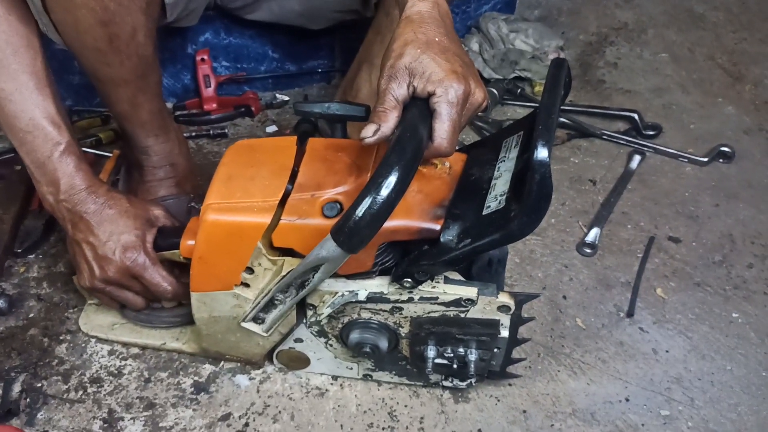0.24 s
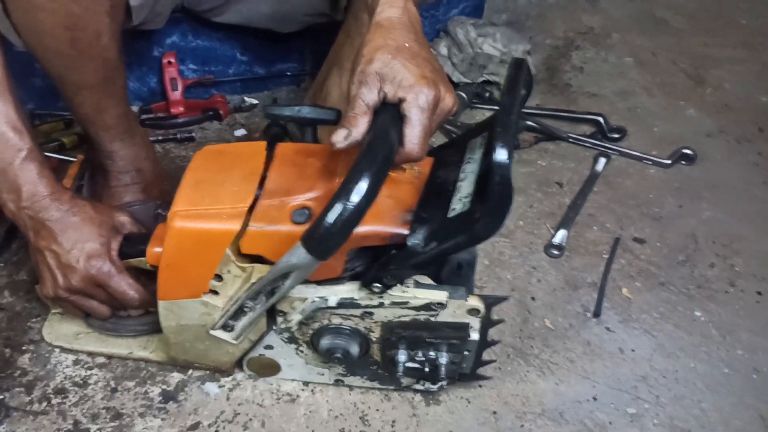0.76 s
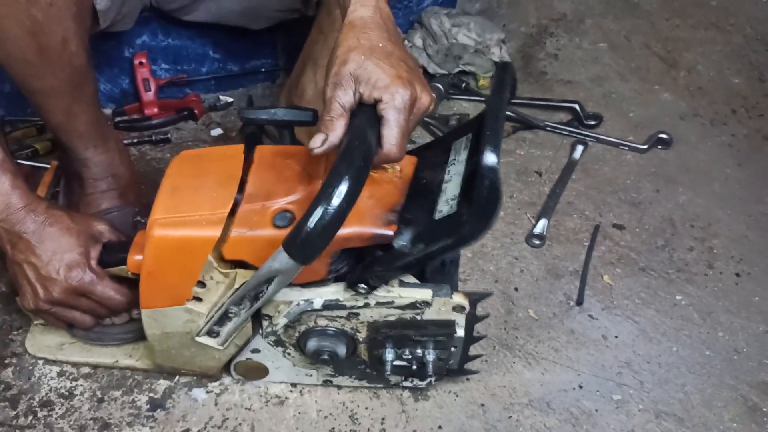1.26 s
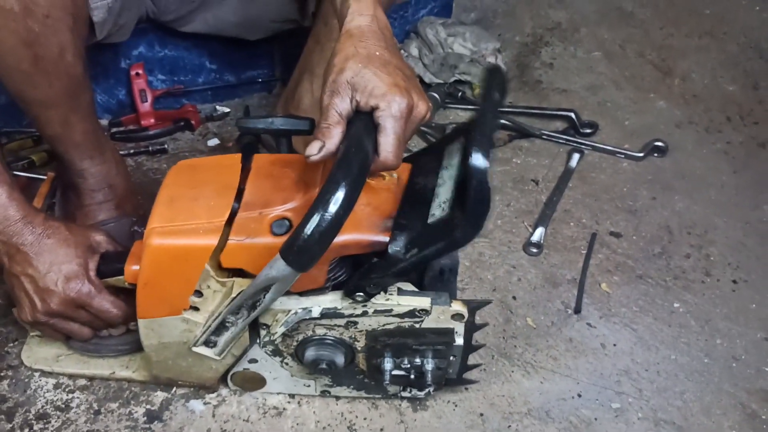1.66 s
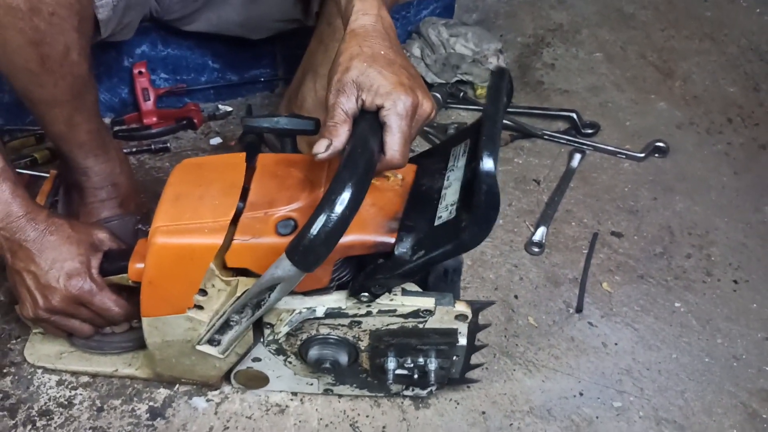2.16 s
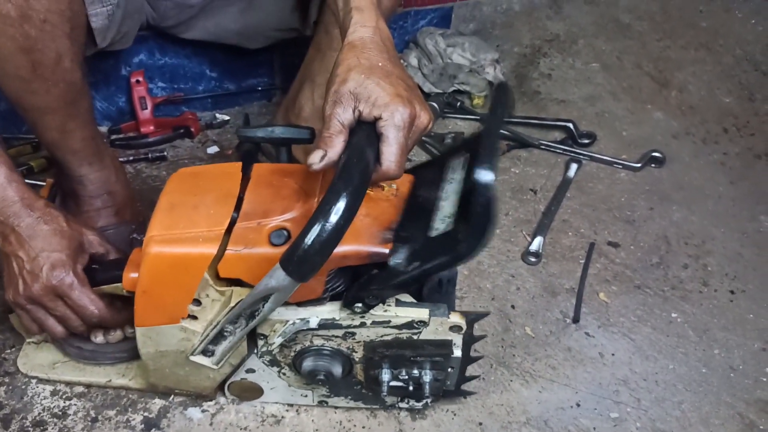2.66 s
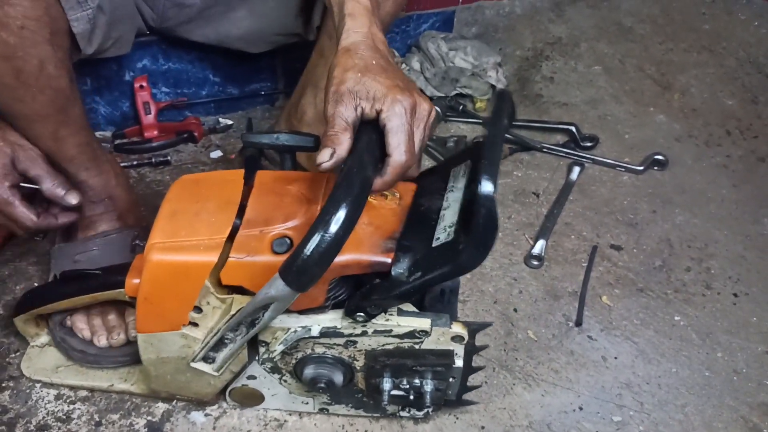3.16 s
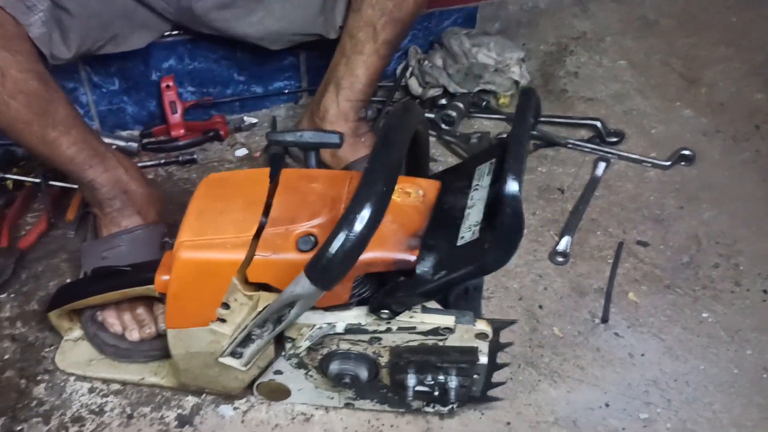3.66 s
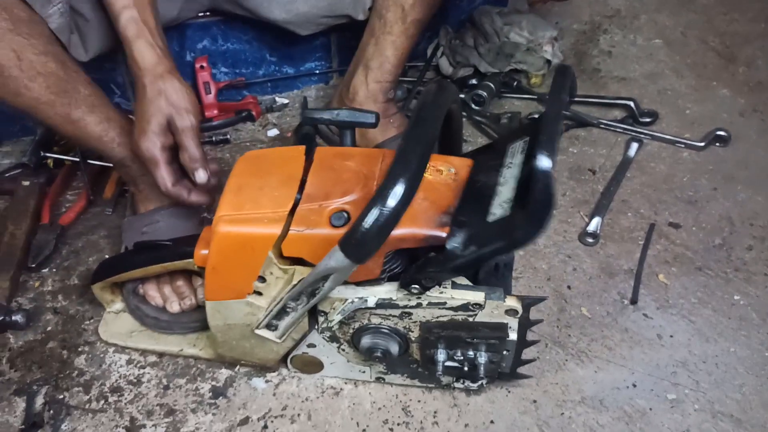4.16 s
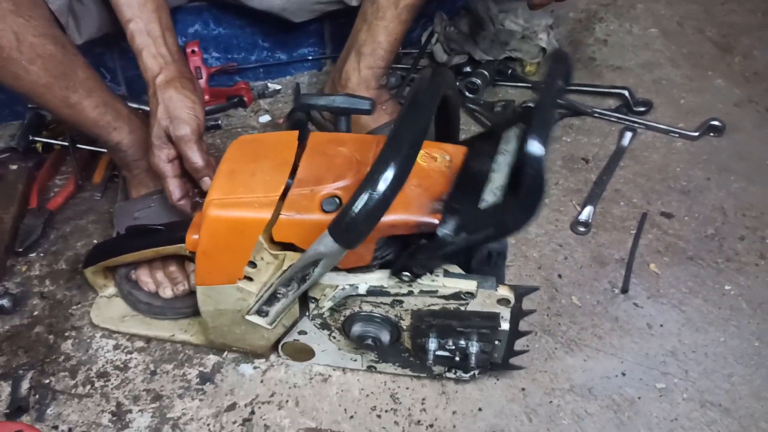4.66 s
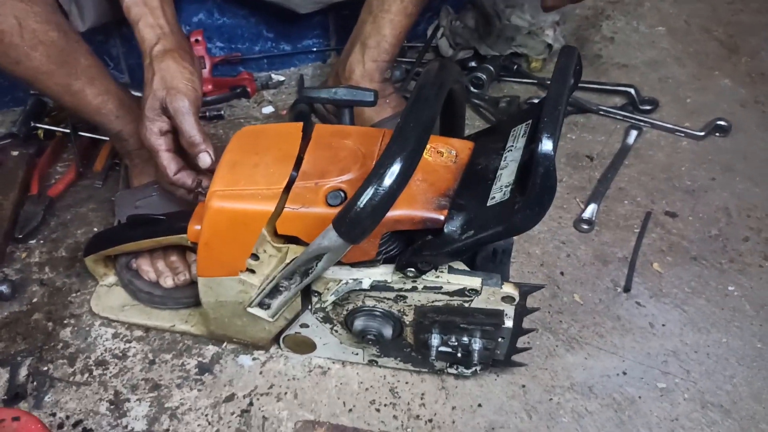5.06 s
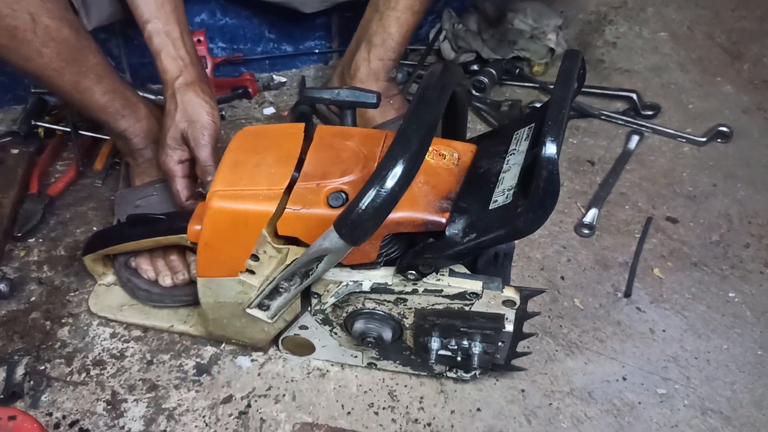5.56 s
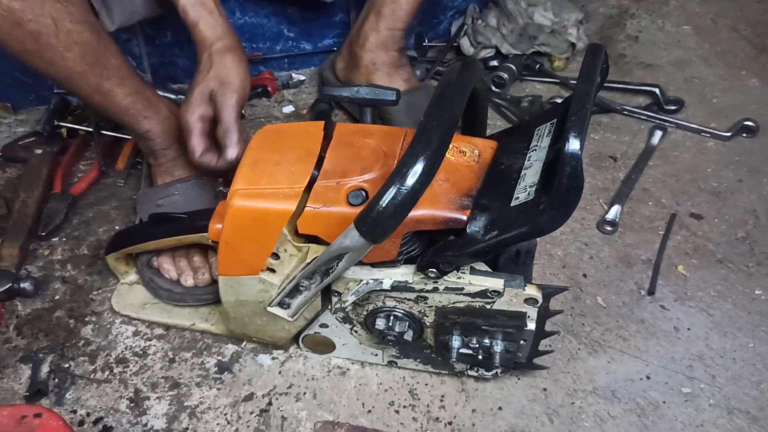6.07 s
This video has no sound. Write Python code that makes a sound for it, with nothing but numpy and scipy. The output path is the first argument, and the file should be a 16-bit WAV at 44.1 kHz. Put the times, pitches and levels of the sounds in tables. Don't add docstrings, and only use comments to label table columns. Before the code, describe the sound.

A small two-stroke saw engine drops from high revs to a lumpy, rattling idle, sputters and stalls, then small steel tools tick, snap and clatter.

```python
import sys
import numpy as np
from scipy import signal
from scipy.fft import rfft, irfft
from scipy.io import wavfile
from scipy.ndimage import uniform_filter1d

SR = 44100
rng = np.random.default_rng(int(sys.argv[2]) if len(sys.argv) > 2 else 0)


def wav_record(signal):
    frames = np.transpose(np.atleast_2d(signal))
    bounded = np.clip(frames, -1, 1)
    quanta = np.round(bounded * 32767).astype(np.int16)
    wavfile.write(sys.argv[1], SR, quanta)


def attenuation_scalar(level_db):
    decades = np.asarray(level_db, float) / 20
    return 10 ** decades


N = 278712
TIME = np.arange(N) / SR

# time in seconds, burn in dB, jolt to the metal in dB.
COAST_FIRINGS = [
    (.048, -25, -59),
    (.237, -23.5, -46),
    (.38, -38, -32),
    (.451, -20.5, -30),
    (.603, -22, -38),
    (.778, -22.5, -34),
    (.897, -28, -50),
    (1.003, -29, -27),
    (1.06, -35, -33),
]
# time in seconds, burn in dB, jolt to the metal in dB.
IDLE_FIRINGS = [(1.1191, -21.5, -22.5), (1.2364, -15.5, -14.5), (1.378, -18.5, -16), (1.5139, -16.5, -15.5),
                (1.6474, -17.5, -21), (1.7601, -18, -20), (1.8699, -19, -23.5), (1.9864, -16, -17.5),
                (2.0975, -15.5, -18), (2.2057, -18.5, -22.5), (2.285, -30, -23), (2.4063, -23, -40),
                (2.4709, -21, -30), (2.566, -19.5, -22), (2.6575, -17, -16.5), (2.771, -24.5, -27),
                (2.8624, -20, -15), (2.9725, -27, -49), (3.0945, -17.5, -18.5), (3.2106, -16.5, -21),
                (3.326, -18.5, -16.5), (3.436, -46, -43), (3.4983, -17, -15.5), (3.6112, -20, -18),
                (3.7221, -17, -21), (3.8357, -19, -18), (3.9456, -18, -21), (4.0552, -18.5, -25),
                (4.1677, -17.5, -15)]
# time in seconds, burn in dB, jolt to the metal in dB.
DYING_FIRINGS = [
    (4.2733, -30, -28),
    (4.4096, -23, -19.5),
    (4.5074, -23.5, -25.5),
    (4.6532, -23, -22.5),
    (4.726, -53, -58),
]
HEAVES_S = [
    4.776,
    4.843,
]
# time in seconds, turn length in seconds.
TURN_LENGTH = [(0, .0117), (1.2, .029), (4.25, .029), (4.33, .033), (4.7, .037), (4.9, .09)]
# time in seconds, level in dB.
SUCTION = [(0, -26.5), (.5, -24.5), (.9, -25.5), (1.2, -19), (2.6, -17), (3.5, -18.5), (4.76, -17.5),
           (4.94, -29.5), (5, -35)]
# time in seconds, level in dB.
SHAKE = [(0, -25.5), (.17, -27.5), (.45, -29), (.6, -20.5), (.88, -23), (1.02, -26.5), (1.5, -21),
         (2.3, -22.5), (2.45, -27), (2.85, -27), (3.02, -20.5), (3.45, -26.5), (3.6, -22.5), (3.9, -27),
         (4.25, -19), (4.4, -31.5), (4.72, -34), (5, -47)]
# time in seconds, level in dB.
STALL_TICKS = [
    (4.716, -55),
    (4.759, -49),
    (4.836, -38),
    (4.856, -30.5),
    (4.966, -38.5),
]

# pitch in Hz, level in dB, time to fade by 60 dB in seconds.
PIPE_TONES = [(139, 4.5, 0.071), (228.3, 4, 0.12), (338.3, 1.5, 0.084), (442.3, -4.5, 0.2),
              (554, -9.5, 0.087), (680, -9, 0.22), (782.5, 1, 0.095), (875, 5.5, 0.04)]
# pitch in Hz, level in dB, time to fade by 60 dB in seconds.
AIR_BOX_TONES = [(1050, -7, 0.017), (1520, 0, 0.023), (1700, -2, 0.024)]
# centre in Hz, width in Hz, level in dB.
SINGING_BANDS = [(340, 96, -26.5), (209, 28, -22)]
# pitch in Hz, level in dB, time to fade by 60 dB in seconds.
MUFFLER_TONES = [(123, 26, 0.029), (245, -9, 0.0067), (60, -21, .05)]
# frequency in Hz, level per Hz in dB.
CASING_COLOUR = [(700, -37), (1300, -12), (2100, -13.5), (3500, -3.5), (4120, 0.5), (5470, 2), (6070, 3.5),
                 (6820, -4.5), (8280, -4), (11000, -27.5), (14300, -44), (22000, -92)]
# centre in Hz, width in Hz, level in dB.
CASING_RINGS = [(1754, 22, -17.5), (2394, 78, -22), (3243, 14.5, -10), (3940, 29, -8), (4200, 79, -7),
                (4594, 86, -7.5), (4800, 47, -8.5), (5032, 65, -3), (5800, 79, -13), (6187, 47, -3),
                (7300, 120, -15.5), (7790, 170, -14.5), (8310, 140, -15.5)]
# frequency in Hz, level per Hz in dB.
CRACK_COLOUR = [(600, -13), (1500, -1.5), (2500, -16.5), (5000, 1.5), (8000, 2.5), (10500, -8.5),
                (13000, -5.5), (15300, -0.5)]
# frequency in Hz, level per Hz in dB.
FIZZ_COLOUR = [(7000, -48), (8800, 3), (10200, -29), (11500, -8), (13500, -5.5), (15200, 0.5)]

# time in seconds, peak level in dB.
TICKS = [(5.0918, -29), (5.1274, -36), (5.1726, -34), (5.1936, -34), (5.2458, -27), (5.3147, -28),
         (5.397, -25.5), (5.4286, -35), (5.4904, -42), (5.5618, -33), (5.5822, -28), (5.6101, -32),
         (5.6391, -37), (5.672, -34.5), (5.7448, -42), (5.7967, -44), (6.0701, -46)]
# pitch in Hz, level in dB, time to fade by 60 dB in seconds.
SPANNER_TONES = [(3225, -13, .08), (4081, -13, .12), (4840, -19, .12), (6140, -9, .12), (7370, 1, 0.14),
                 (7430, -7, .15), (9060, -8.5, 0.16), (9740, -12, 0.21), (11800, -24, .25),
                 (13100, -21, .2), (14790, -12, .2)]
# time in seconds, level in dB.
SPANNER_BOUNCES = [
    (6.1297, -34),
    (6.133, -18),
    (6.146, -27.5),
    (6.16, -34),
]
# frequency in Hz, level per Hz in dB.
SNAP_COLOUR = [(120, -48), (200, -19), (728, -2), (1210, -7), (1480, -6.5), (2330, -18.5), (3960, -3.5),
               (7350, -5.5), (8200, -6), (10400, -19.5), (15500, -20)]
# time in seconds, level in dB, pitch in Hz, time to fade by 60 dB in seconds.
KNOCKS = [
    (5.243, -34, 470, .05),
    (5.245, -37, 110, .2),
    (5.268, -34, 455, .1),
    (5.27, -38, 570, .12),
    (5.283, -30, 450, .08),
    (6.129, -25, 173, .05),
    (6.265, -34, 478, .045),
]

# frequency in Hz, level per Hz in dB.
WHINE_COLOUR = [(71, -44), (120, -10), (243, -2.5), (350, -11.5), (650, -2), (1310, -4.5), (1730, -8.5),
                (2700, -15.5), (4000, -5), (5200, -34), (8800, -120)]
# centre in Hz, width in Hz, level in dB.
WHINE_RINGS = [(683, 120, -18.5), (860, 49, -14), (1306, 18, -5.5), (1459, 27, -7.5), (2460, 110, -8.5),
               (2930, 37, -11)]
# frequency in Hz, level per Hz in dB.
HISS_COLOUR = [(1470, -41), (2500, -17), (3860, -16), (4270, 2), (5450, -18), (6150, 3), (6850, -18),
               (9150, -0.5), (11000, -30), (15500, -23)]
# centre in Hz, width in Hz, level in dB.
HISS_RINGS = [(4410, 120, -4), (4860, 220, -6.5), (6130, 230, -4)]
# pitch in Hz, level in dB, time to fade by 60 dB in seconds.
FAR_TONES = [(82, 0, 0.087), (165, -11, .05)]

FIRST_TURN_S, LAST_TURN_S, STOP_S = .0109, 4.931, 4.997


def evened(x):
    return x / np.sqrt(np.mean(x ** 2) + 1e-20)


def level_curve(rows):
    s, db = np.transpose(rows)
    return np.interp(TIME, s, db, -120, -120)


def train(times, sizes):
    out = np.zeros(N)
    spots = np.round(np.asarray(times) * SR).astype(int)
    np.add.at(out, np.clip(spots, 0, N - 1), sizes)
    return out


def strike(times, sizes, shape):
    return signal.oaconvolve(train(times, sizes), shape)[:N]


def ring(tones, lead=0.):
    t = np.arange(SR // 4) / SR
    return sum(attenuation_scalar(db - 60 * t / t60) * np.cos(2 * np.pi * hz * t + lead) for hz, db, t60 in tones)


def burst(rise_s, hold_s, fall_db_s):
    t = np.arange(SR // 2) / SR
    return np.minimum(t / rise_s, 1) ** 2 * attenuation_scalar(-fall_db_s * np.maximum(t - hold_s, 0))


def grit(spread_db, size):
    flicker = evened(uniform_filter1d(rng.standard_normal(N), size))
    return evened(rng.standard_normal(N) * attenuation_scalar(spread_db * flicker))


def colour(x, points, rings=()):
    hz = np.fft.rfftfreq(4096, 1 / SR)
    f, db = np.transpose(points)
    power = attenuation_scalar(np.interp(np.log(hz + 1), np.log(f), db, -90, db[-1])) ** 2
    power = power + sum(30 * attenuation_scalar(d) ** 2 / (1 + (2 * (hz - c) / w) ** 2) for c, w, d in rings)
    cepstrum = irfft(np.log(power / power.mean() + 1e-10) / 2)
    cepstrum[1:2048] *= 2
    cepstrum[2049:] = 0
    return signal.oaconvolve(x, irfft(np.exp(rfft(cepstrum))))[:N]


def crank_turns(fire_s):
    marks = np.concatenate([[FIRST_TURN_S], fire_s, HEAVES_S, [LAST_TURN_S]])
    out = [[0.]]
    for s, after in zip(marks, marks[1:]):
        span = after - s
        count = round(span / np.interp((s + after) / 2, *np.transpose(TURN_LENGTH)))
        pumping = .034 * (span / count / .028) ** 3.2
        slowing = count * (.008 + pumping)
        out.append(s + span * np.expm1(slowing * np.arange(count) / count) / np.expm1(slowing))
    return np.append(np.concatenate(out), LAST_TURN_S)


def intake(turn_s, luck):
    gap = np.gradient(turn_s)
    quick = np.minimum(gap / 0.033, 1)
    size = attenuation_scalar(np.interp(turn_s, TIME, level_curve(SUCTION)) + luck[:, 0])
    stretch = (gap / 0.02) ** 0.42 * (1 + 0.11 * luck[:, 3])
    nearest = np.searchsorted((turn_s[1:] + turn_s[:-1]) / 2, TIME)
    ms = 1000 * (TIME - turn_s[nearest]) / stretch[nearest]
    push = np.exp(-(ms / 0.37) ** 2)
    pull = 0.68 * np.exp(-((ms - 1.3) / 0.56) ** 2)
    puff = size[nearest] * (push - pull)
    echo = pipe_echo(puff, turn_s, nearest, quick)
    pop = ring([(850, -1.5, .014), (1250, 0, .014), (1600, -5, .014)], lead=.3)
    pop = np.convolve(pop, np.hanning(12) / 6)
    pops = strike(turn_s - .0003, size * attenuation_scalar(1.9 * luck[:, 2]) / quick ** .5, pop)
    churn = strike(turn_s - .002, size, burst(0.0013, 0.0053, 587.0)) * rng.standard_normal(N)
    churn = colour(churn, [(80, -30), (200, -1.5), (400, 3), (900, -4), (1600, -8), (3000, -39)])
    rasp_db = -6.5 + .5 * np.minimum(1 / gap - 78, 0)
    rasp = strike(turn_s, size * attenuation_scalar(rasp_db), ring(AIR_BOX_TONES, lead=-1.5))
    return attenuation_scalar(5.5) * puff + attenuation_scalar(-39.0) * echo + .4 * pops + .2 * churn + crank_song(turn_s) + rasp


def pipe_echo(puff, turn_s, nearest, quick):
    echo = 0
    for tone in PIPE_TONES:
        stir = attenuation_scalar(2.83 * rng.standard_normal(len(turn_s))) * quick ** max(330 / tone[0] - 1.1, 0)
        echo = echo + signal.oaconvolve(puff * stir[nearest], ring([tone], lead=0.16))[:N]
    since = np.searchsorted(turn_s, TIME, "right") - 1
    bend = .02 * np.clip(rng.standard_normal(len(turn_s)), -2, 2)
    return np.interp(TIME + bend[since] * (TIME - turn_s[since]), TIME, echo)


def crank_song(turn_s):
    angle = 2 * np.pi * np.interp(TIME, turn_s, np.arange(len(turn_s)), None, None)
    speed = 1 / np.interp(TIME, turn_s, np.gradient(turn_s))
    fade = attenuation_scalar(-40 * np.minimum(TIME, 2) ** 2)
    song = 0
    for k in (4, 5):
        power = sum(attenuation_scalar(db) ** 2 / (1 + (2 * (k * speed - hz) / w) ** 2) for hz, w, db in SINGING_BANDS)
        song = song + np.sqrt(2 * power) * fade * np.sin(k * angle)
    return song


def muffler(fire_s, burn_db):
    thump = np.convolve(ring(MUFFLER_TONES, lead=-0.83), np.hanning(60))
    return attenuation_scalar(5.5) * strike(fire_s + 0.00404, attenuation_scalar(burn_db), thump / abs(thump).max())


def exhaust_crack(fire_s, burn_db, jolt_db):
    crack_db = -7.0 + 0.76 * burn_db + 0.14 * jolt_db
    shape = burst(0.0054, 0.0081, 1300.0) + 0.23 * burst(0.01, 0.028, 240.0)
    blast = strike(fire_s - .006, attenuation_scalar(crack_db), shape)
    return attenuation_scalar(7.5) * colour(blast * grit(5.1, size=20), CRACK_COLOUR)


def casing(turn_s, fire_s, jolt_db, luck):
    gap = np.gradient(turn_s)
    slap = 0.23 + strike(turn_s - 0.3 * gap, attenuation_scalar(2.7 * luck[:, 1]), burst(0.005, 0.0069, 1520.0))
    slap += 0.5 * np.interp(TIME, turn_s, np.clip(1 - gap / 0.033, 0, 1))
    kick = 0.9 * burst(0.002, 0.0072, 850.0) + 0.43 * burst(0.0011, 0.013, 260.0)
    jolt = strike(fire_s - .0062, attenuation_scalar(jolt_db), kick)
    stall_s, stall_db = np.transpose(STALL_TICKS)
    jolt += strike(stall_s, attenuation_scalar(stall_db), burst(.001, 0.0033, 900.))
    shaken = strike(fire_s - .0065, attenuation_scalar(jolt_db), burst(0.039, 0.012, 174.0))
    rattle = jolt + 0.67 * shaken * slap + attenuation_scalar(level_curve(SHAKE)) * slap
    return 0.81 * colour(rattle * grit(1.65, size=40), CASING_COLOUR, CASING_RINGS)


def clutch_fizz(turn_s, luck):
    skid = attenuation_scalar(-25 + 0.74 * level_curve(SHAKE))
    skid += attenuation_scalar(-31.5) * np.exp(-((TIME - 0.7) / 0.22) ** 2)
    spit = 0.42 + strike(turn_s - .004, attenuation_scalar(6.3 * luck[:, 2]), burst(.002, 0.0061, 1600.))
    return colour(skid * attenuation_scalar(4.0) * spit * grit(2.5, size=20), FIZZ_COLOUR)


def engine():
    fire_s, burn_db, jolt_db = np.transpose(COAST_FIRINGS + IDLE_FIRINGS + DYING_FIRINGS)
    turn_s = crank_turns(fire_s)
    luck = rng.standard_normal((len(turn_s), 4))
    saw = intake(turn_s, luck) + muffler(fire_s, burn_db)
    saw = saw + casing(turn_s, fire_s, jolt_db, luck)
    saw = saw + exhaust_crack(fire_s, burn_db, jolt_db) + clutch_fizz(turn_s, luck)
    return saw * (TIME < STOP_S)


def clutch_drum():
    peak_s, pitch_hz = 4.28, 3840
    level_db = -33 - 7 * np.maximum(peak_s - TIME, 0) - 11 * np.maximum(TIME - peak_s, 0)
    on = uniform_filter1d(1. * (TIME > 4.2) * (TIME < 5.2), size=4000)
    waver = 0.73 * evened(uniform_filter1d(rng.standard_normal(N), size=500))
    return on * attenuation_scalar(level_db) * np.sqrt(2) * np.sin(2 * np.pi * pitch_hz * TIME + waver)


def fingered_tool():
    s, db = np.transpose(TICKS)
    steel = ring(SPANNER_TONES) / 2.4
    damped = np.convolve(steel, np.hanning(6) / 2, "same") * burst(.0005, .003, 900.)[:len(steel)]
    scrape = strike(s, attenuation_scalar(db), burst(.0005, 0.0029, 2500.)) * grit(2.5, size=20)
    scrape = colour(scrape, [(4000, -27), (5500, 7.5), (7500, -5), (10500, -13), (12000, -20)])
    click = strike(s, attenuation_scalar(db - 19), burst(0.00057, .003, 2500.)) * rng.standard_normal(N)
    return strike(s, attenuation_scalar(db + 6.0), damped) + 0.63 * scrape + colour(click, FIZZ_COLOUR)


def dropped_spanner():
    s, db = np.transpose(SPANNER_BOUNCES)
    clatter = strike(s, attenuation_scalar(db - 5.5), burst(.0005, 0.0032, 900.0)) * grit(2.3, size=30)
    clatter = colour(clatter, [(300, -2), (1500, -12), (3200, 0.5), (5000, 0.5), (9000, -9), (15000, -24)])
    return strike(s, attenuation_scalar(db + 7.0), ring(SPANNER_TONES) / 2.4) + clatter


def snapped_lever():
    shape = burst(0.00023, 0.0026, 2400.) + 0.15 * burst(0.0045, 0.027, 390.0)
    snap = strike([5.854], attenuation_scalar(-11), shape)
    return colour(snap * grit(3.0, size=20), SNAP_COLOUR, [(3930, 58, -15)])


def hollow_knocks():
    out = np.zeros(N)
    for s, db, hz, t60 in KNOCKS:
        tone = np.convolve(ring([(hz, db, t60)], lead=-1.15), np.hanning(30) / 15)
        out += strike([s], 0.83, tone)
    return 1.34 * out


def whining_machine():
    level_db = -39.5 - 23 * np.maximum(TIME - 5.83, 0)
    wash = attenuation_scalar(level_db) * colour(grit(0.93, size=900), WHINE_COLOUR)
    singing = attenuation_scalar(level_db - 100 * np.maximum(TIME - 5.87, 0)) * grit(0.81, size=1500)
    return 0.77 * wash + 0.81 * colour(singing, [(100, -30), (4000, -30)], WHINE_RINGS)


def far_engine():
    thud_s = 4.757 + .0722 * np.arange(22)
    thud = np.convolve(ring(FAR_TONES, lead=-1.5), np.hanning(300))
    far = strike(thud_s, attenuation_scalar(rng.standard_normal(len(thud_s))), thud)
    level_db = -48.5 + 5.5 * (TIME - STOP_S)
    return attenuation_scalar(level_db) * far / np.std(far[round(5.2 * SR):])


def shop_hiss():
    return attenuation_scalar(-44) * colour(grit(0.7, size=600), HISS_COLOUR, HISS_RINGS)


def rumble():
    hum = colour(rng.standard_normal(N), [(15, -2), (50, -6), (150, -10), (400, -35)])
    return attenuation_scalar(-58.0) * evened(hum)


def scene():
    saw = attenuation_scalar(7.5) * engine() + clutch_drum()
    tools = fingered_tool() + dropped_spanner() + snapped_lever() + hollow_knocks()
    shop = whining_machine() + far_engine() + shop_hiss() + rumble()
    mic_noise = attenuation_scalar(-69) * rng.standard_normal(N)
    return (saw + tools + shop + mic_noise)[None]


def top_cut(x):
    return signal.sosfilt(signal.butter(12, 16820, fs=SR, output="sos"), x)


def record(dry):
    recovering_db = -23.5 * np.exp(-abs(TIME - STOP_S) / 0.23)
    gain_db = np.where(TIME < STOP_S, -7.5, recovering_db)
    x = dry * attenuation_scalar(uniform_filter1d(gain_db, size=200))
    x = signal.sosfilt(signal.butter(3, 80, "high", fs=SR, output="sos"), x)
    x = signal.oaconvolve(np.tanh(x), signal.firwin(301, 15650, fs=SR)[None], "same")
    return top_cut(x)


dry = scene()
out = record(dry)
wav_record(out)
```